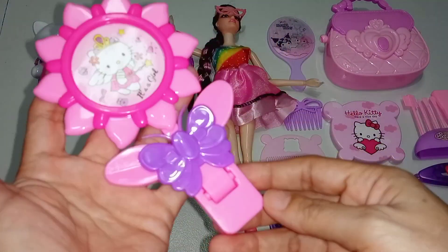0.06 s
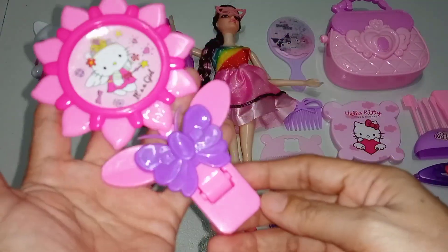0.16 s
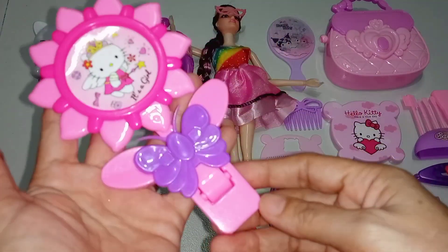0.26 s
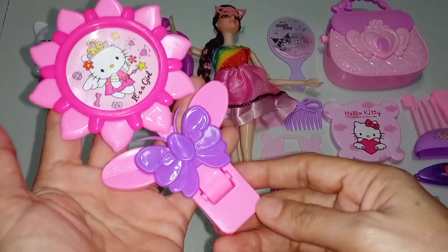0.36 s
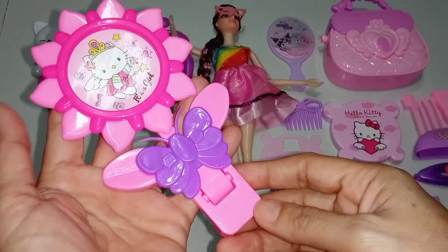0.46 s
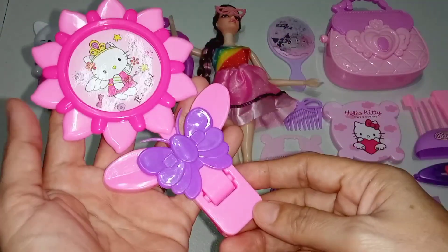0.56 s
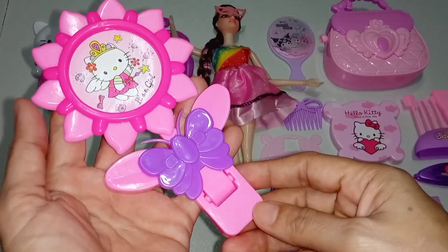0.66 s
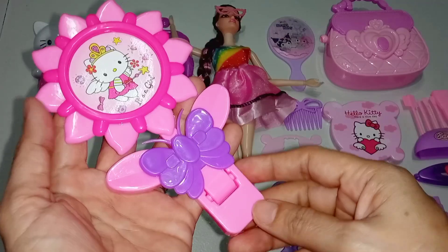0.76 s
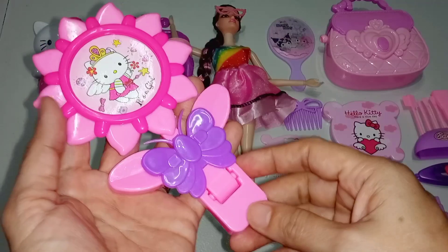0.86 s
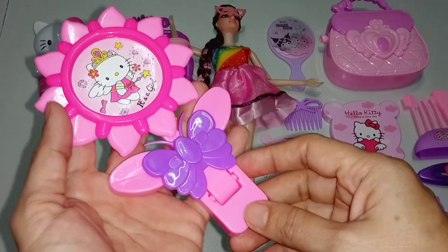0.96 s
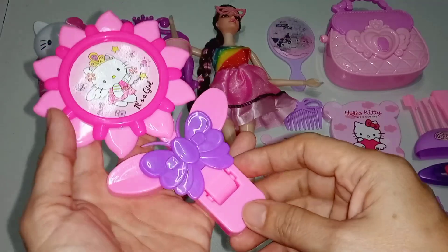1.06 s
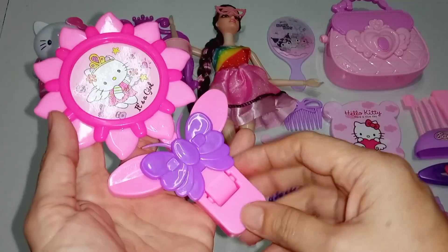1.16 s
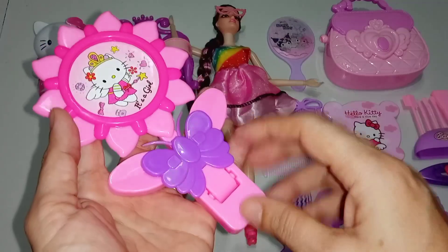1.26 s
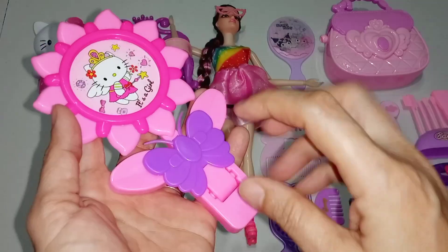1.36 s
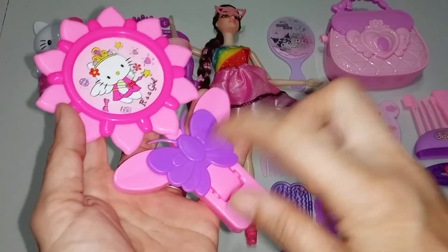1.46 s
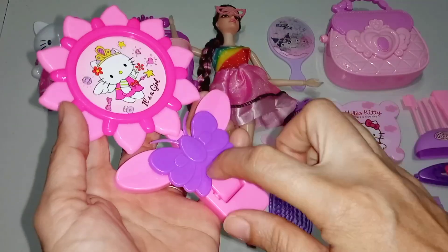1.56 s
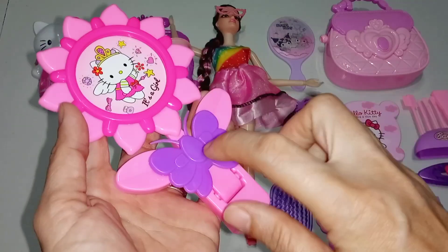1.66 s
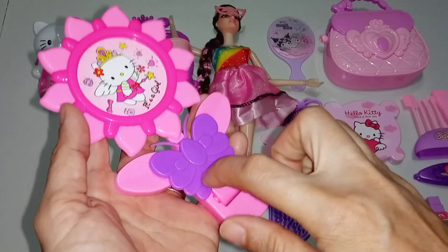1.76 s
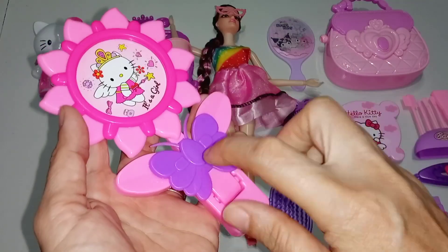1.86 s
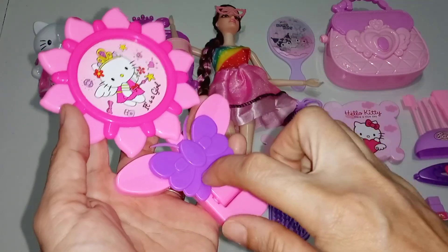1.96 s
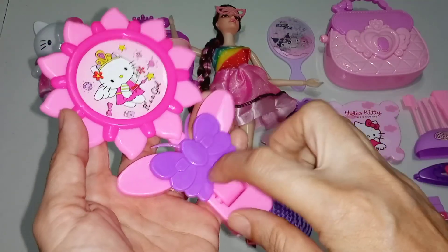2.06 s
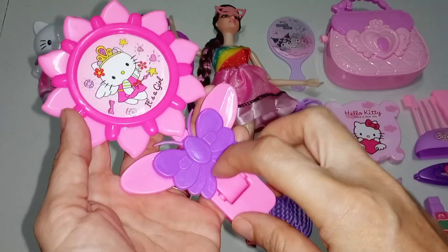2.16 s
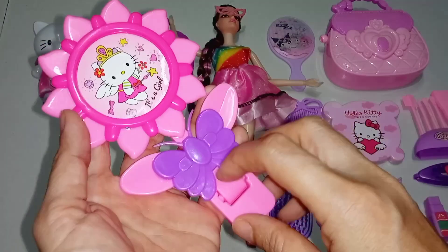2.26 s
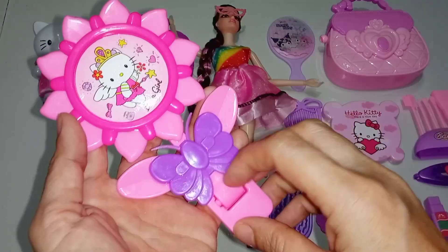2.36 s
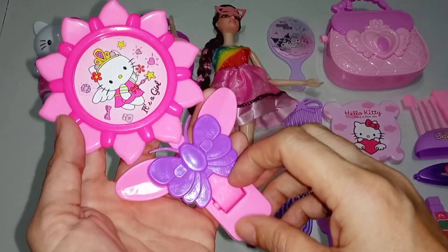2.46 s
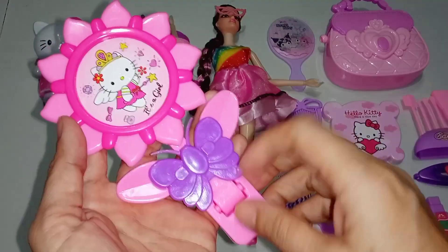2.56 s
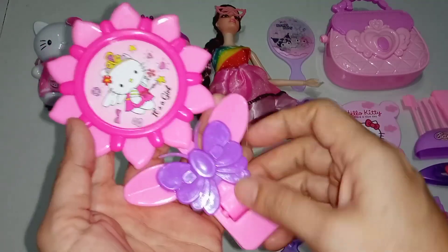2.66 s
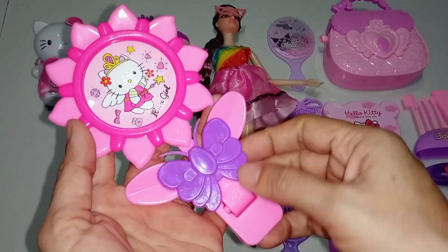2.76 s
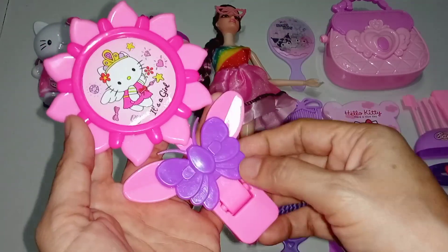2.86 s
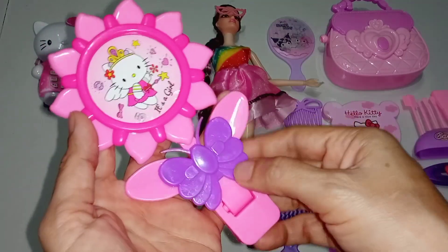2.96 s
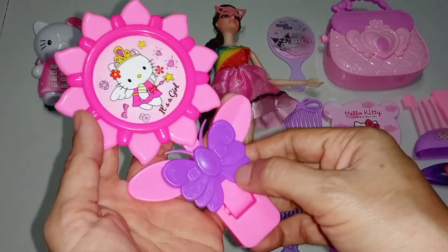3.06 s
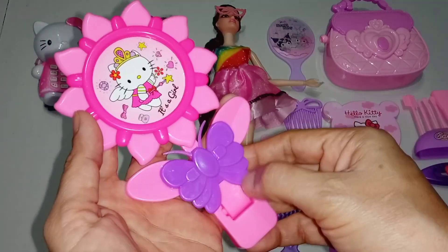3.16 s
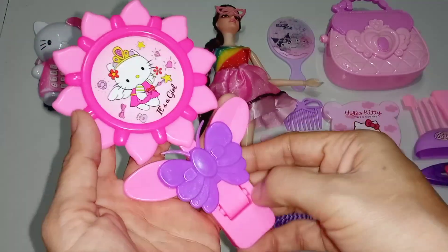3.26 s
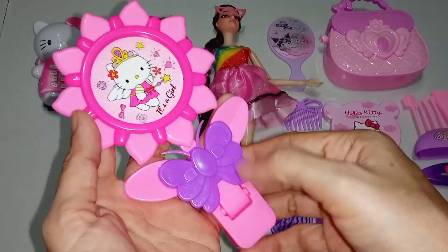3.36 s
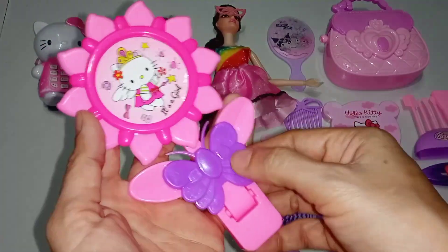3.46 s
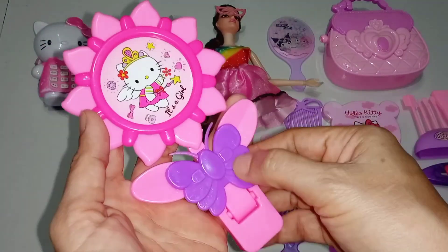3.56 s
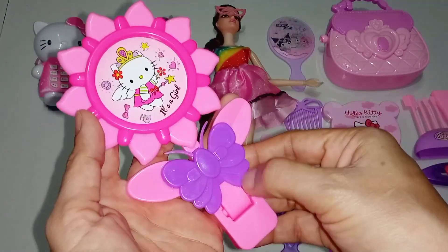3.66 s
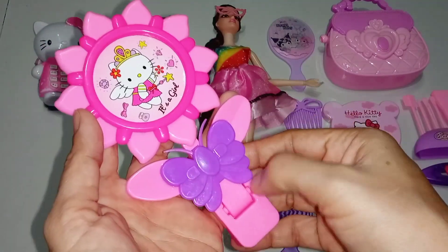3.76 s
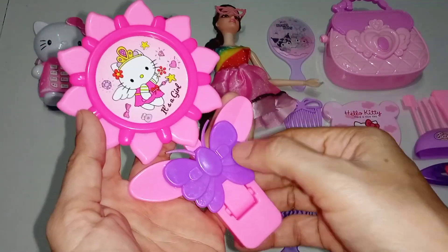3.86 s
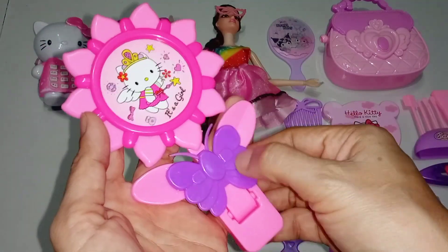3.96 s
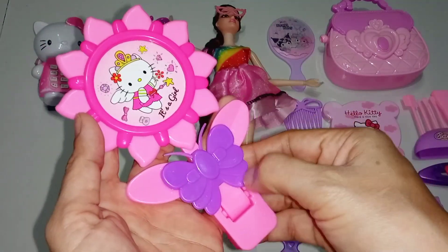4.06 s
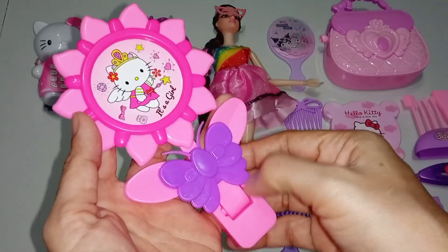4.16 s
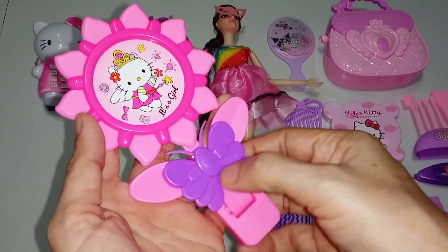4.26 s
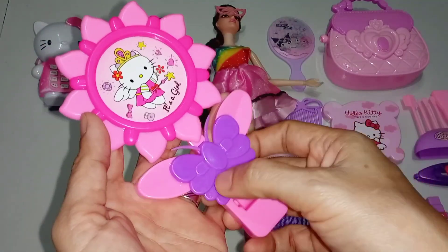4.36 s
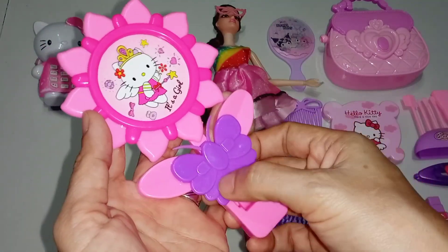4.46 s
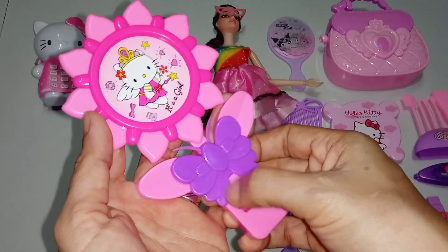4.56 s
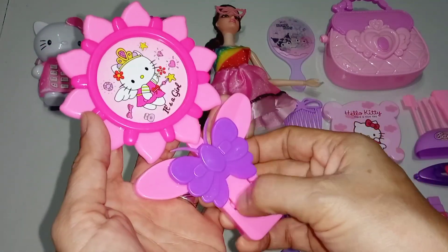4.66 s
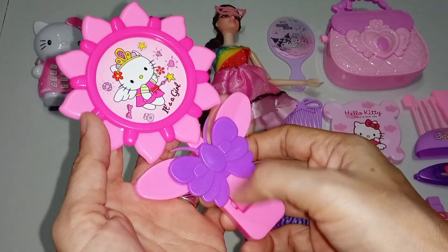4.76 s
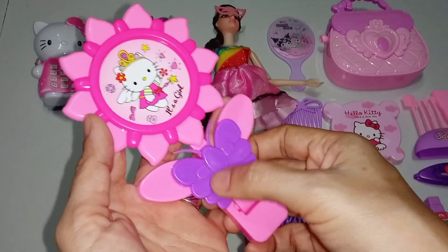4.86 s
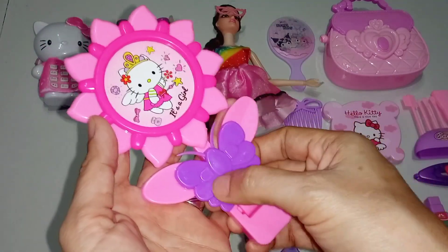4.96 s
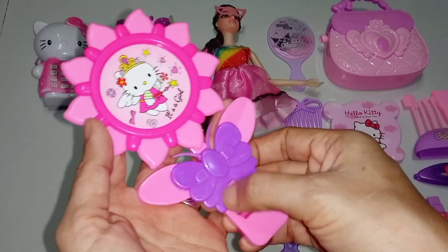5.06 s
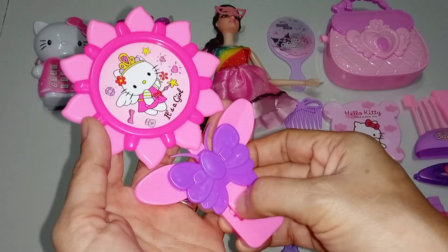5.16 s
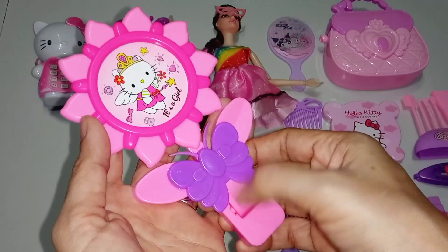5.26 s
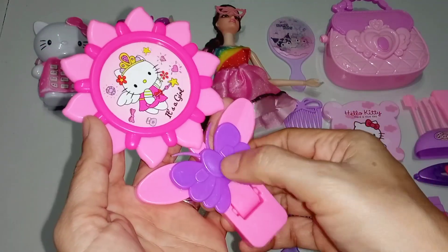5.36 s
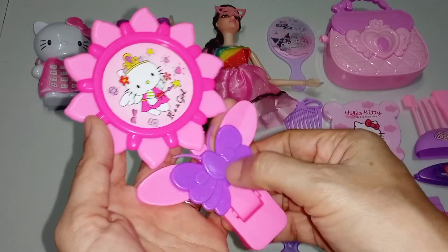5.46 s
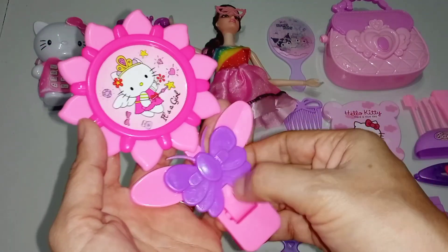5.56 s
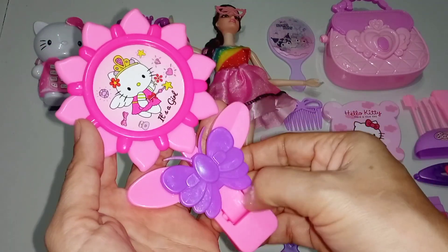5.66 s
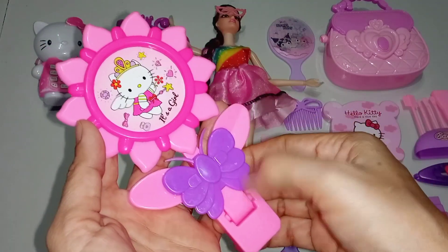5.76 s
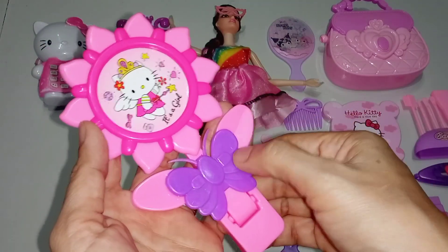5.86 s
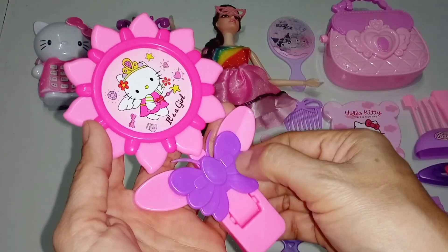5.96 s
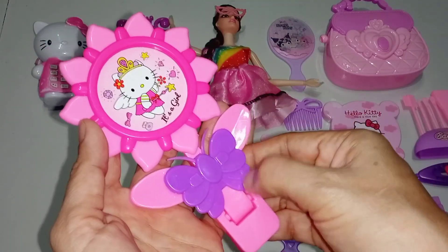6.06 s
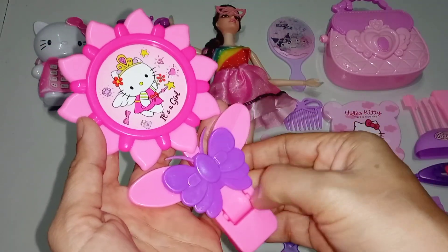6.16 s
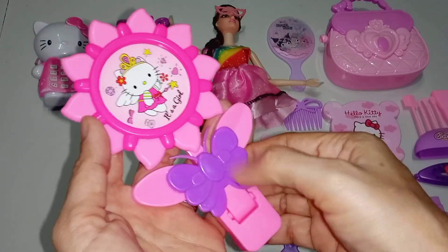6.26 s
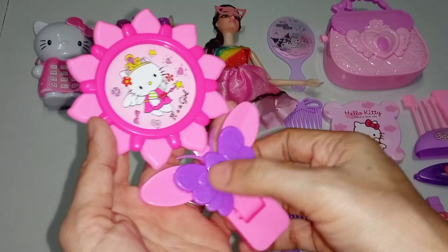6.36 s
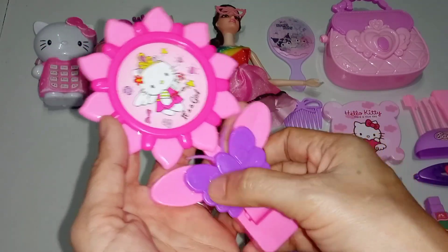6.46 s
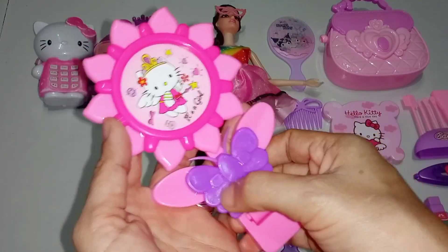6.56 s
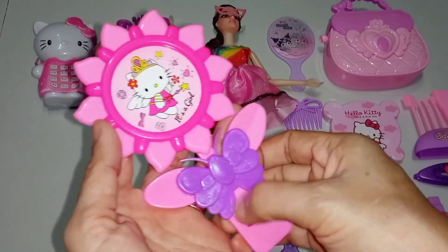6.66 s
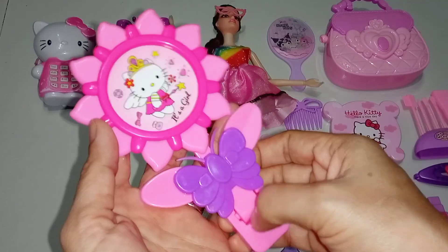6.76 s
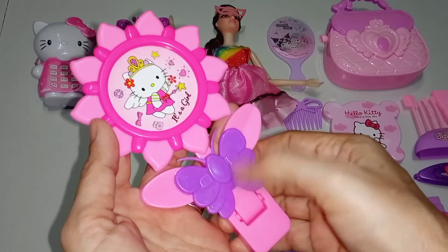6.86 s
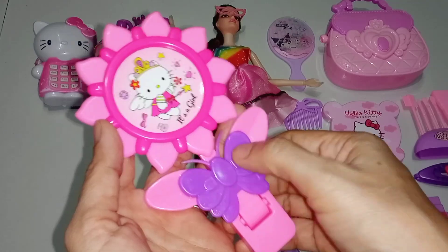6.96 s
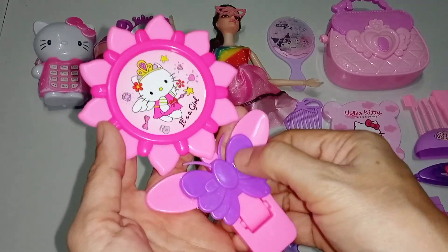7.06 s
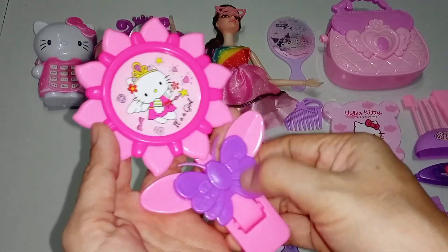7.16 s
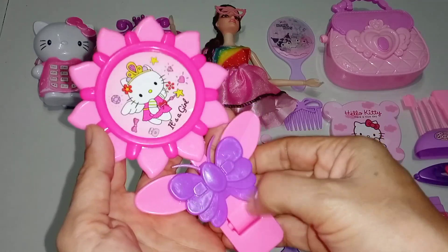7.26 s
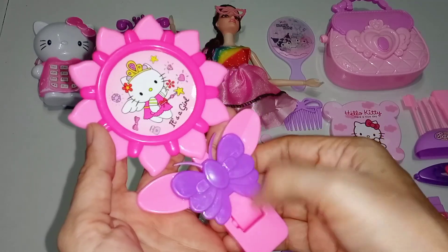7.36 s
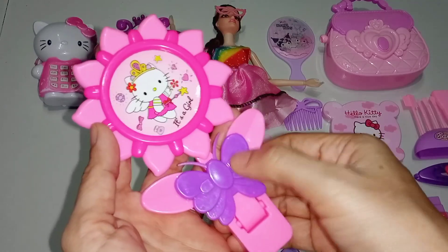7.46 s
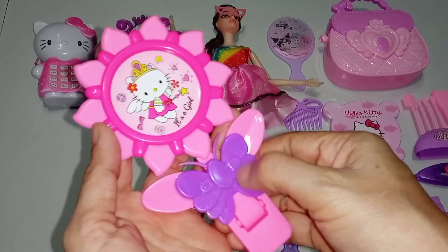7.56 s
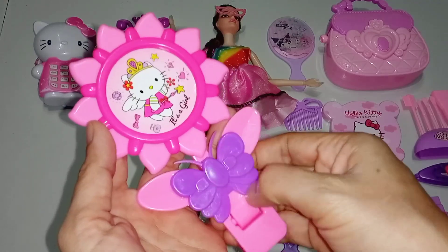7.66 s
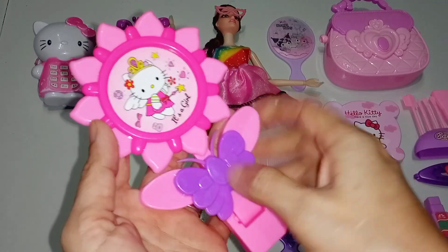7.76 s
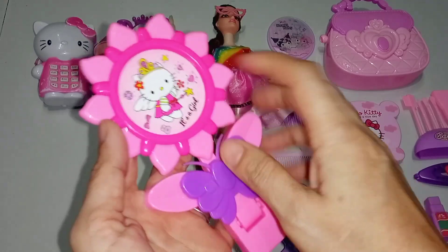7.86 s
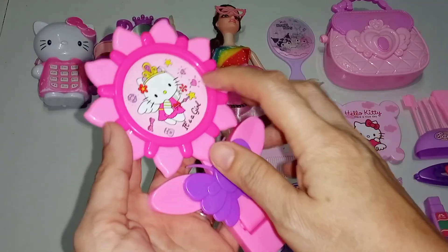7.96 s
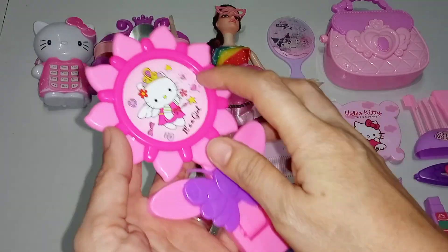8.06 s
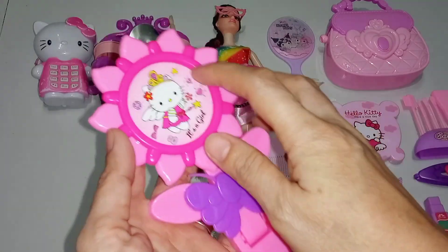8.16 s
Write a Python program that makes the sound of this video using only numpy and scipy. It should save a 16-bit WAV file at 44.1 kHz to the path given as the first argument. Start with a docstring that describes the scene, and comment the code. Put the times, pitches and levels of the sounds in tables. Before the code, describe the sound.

An appliance hums in a small room, with a low drone and the soft rush of its fan. Close to the microphone, a fingernail gives three light taps to the hollow plastic bow of a toy mirror. After a short pause, more taps and flicks follow in uneven clusters, a few of them much sharper. Each click is brief and hard, with only a slight room reflection.

```python
"""A small room opens on an appliance: a hum of mains harmonics, a low drone and the soft rush of its fan.
At 1.6 s a fingernail gives three light taps to the hollow plastic bow of a toy mirror, up close.
Each is a few hard micro-impacts that ring the thin shell for milliseconds; the walls answer briefly.
From 3.2 s to 8 s taps and flicks come in uneven clusters, sharpest near 5.2 s and 6.8 s, over the hum."""
import sys
import numpy as np
from scipy import signal
from scipy.fft import rfft, irfft, next_fast_len
from scipy.io import wavfile
from scipy.ndimage import map_coordinates

SR = 44100
rng = np.random.default_rng(int(sys.argv[2]) if len(sys.argv) > 2 else 0)


def dump_mix(stems):
    """Bounce the given channels to the path in sys.argv[1] as a 16-bit WAV at rate SR."""
    frames = np.atleast_2d(stems).T  # one column per channel
    limited = np.clip(frames, -1, 1)  # hard clip at full scale
    pcm = np.round(limited * 32767).astype(np.int16)
    wavfile.write(sys.argv[1], SR, pcm)


N = 362457


def amp(db):
    return 10 ** (np.asarray(db) / 20)


def unit_rms(x):
    return x / np.sqrt(np.mean(np.abs(x) ** 2) + 1e-20)


def curve_at(points, hz):
    """Read (f/Hz, value) breakpoints on a log frequency axis."""
    f, value = np.transpose(points)
    return np.interp(np.log(hz + 1), np.log(f + 1), value)


def eq(x, response):
    """Shape x with a gain given as a function of frequency."""
    size = next_fast_len(x.shape[-1] + 8192)
    return irfft(rfft(x, size) * response(np.fft.rfftfreq(size, 1 / SR)), size)[..., :x.shape[-1]]


def wobble(rate):
    """A smooth random modulator, rate knots a second."""
    return map_coordinates(rng.standard_normal(int(N * rate / SR) + 4), [np.arange(N) * rate / SR])


def noise_band(hz, width_hz, order=2):
    """Noise of rms 1 in one resonance; a higher order flattens its top."""
    return unit_rms(eq(rng.standard_normal(N), lambda f: 1 / (1 + (2 * (f - hz) / width_hz) ** order)))


# Tone of the fan and room air: f/Hz, relative level/dB
AIR_SPECTRUM = [(15, -65.5), (30, -32.5), (60, -18.5), (100, -13.5), (160, -19), (230, -19), (330, -24.5),
                (380, -18), (720, -24.5), (1170, -26), (4800, -35), (7000, -44.5), (7800, -50), (9000, -62)]
# Casing resonances in the fan noise: f/Hz, width/Hz, level/dB
CASING_BANDS = [(73, 6.1, -65), (200.6, 5.9, -67.5), (397, 57, -61.5), (1725, 290, -68), (2700, 330, -71.5),
                (4900, 160, -78.5), (6250, 340, -75.5)]
def fan(air_db=-51.5, treble_hz=6800):
    """A bed of rushing air, coloured by the casing; the level drifts a little, the treble flickers."""
    air = amp(air_db) * unit_rms(eq(rng.standard_normal(N), lambda f: amp(curve_at(AIR_SPECTRUM, f))))
    treble = eq(air, lambda f: 1 / (1 + (treble_hz / (f + 1)) ** 12))
    casing = sum(amp(db) * noise_band(hz, width_hz) for hz, width_hz, db in CASING_BANDS)
    drift_db = .4 * wobble(1.4) + .59 * wobble(12)
    flicker_db = 1.9 * wobble(1.3) + 2 * wobble(22)
    return (air - treble + casing) * amp(drift_db) + treble * amp(flicker_db)


# Partials of the hum: harmonic number, level/dB, width/Hz
HUM_PARTIALS = [(1, -70.5, 1.3), (2, -53.5, 5.2), (3, -61.5, 3), (4, -73.5, 0.93), (5, -62, 4.5),
                (6, -66.5, 8.4), (8, -65, 3), (9, -68, 5.8), (10, -79.5, 5.4), (11, -70.5, 9.8),
                (17, -66, 38)]
def mains_hum(mains_hz=59.9):
    """The appliance hums on mains harmonics, each a narrow, slightly unsteady band."""
    return sum(amp(db) * noise_band(k * mains_hz, width_hz) for k, db, width_hz in HUM_PARTIALS)


# Slow swells of the drone: t/s, level/dB
DRONE_ENVELOPE = [(0, -55), (.5, -51.5), (1, -47), (1.5, -47.5), (2, -50.5), (2.4, -51), (2.8, -45),
                  (3.3, -48.5), (3.7, -49), (4.1, -45), (4.6, -51.5), (4.9, -49.5), (5.3, -47),
                  (5.8, -44.5), (6.4, -45.5), (7.1, -57.5), (7.7, -46.5), (8.22, -52)]
def cabinet_drone():
    """The fan shakes the cabinet's low resonance."""
    times, level_db = np.transpose(DRONE_ENVELOPE)
    swell = amp(np.interp(np.arange(N) / SR, times, level_db))
    return swell * noise_band(hz=125.1, width_hz=21, order=4)


# Reverb time of the room: f/Hz, t60/s
ROOM_DECAY = [(500, 0.13), (2600, 0.22), (5000, 0.14), (8000, 0.14)]
# Tone of the reverb: f/Hz, relative level/dB
ROOM_COLOUR = [(500, -13.5), (1500, -10.5), (2600, -1), (4000, -4.5), (5500, 2.5), (7000, 2), (8500, -6)]
def room_tail(build_s=.0032):
    """A fresh reverb tail of energy 1; it builds up as the first walls answer."""
    hz, t, noise = signal.stft(rng.standard_normal(SR // 4), SR, nperseg=128)
    fade_db = curve_at(ROOM_COLOUR, hz)[:, None] - 60 * t / curve_at(ROOM_DECAY, hz)[:, None]
    build_up = 1 - np.exp(-(t / build_s) ** 2)
    tail = signal.istft(noise * amp(fade_db) * build_up, SR, nperseg=128)[1]
    return tail / np.linalg.norm(tail)


# Modes of the plastic shell: f/Hz, relative level/dB, t60/s
SHELL_MODES = [(293, -30, 0.023), (480, -29.5, 0.023), (982, 0, 0.0091), (1310, 0.5, 0.0042),
               (2050, -11, 0.0078), (2630, -15.5, 0.0052), (3100, -16, 0.0091), (3446, -14, 0.0058),
               (4340, -12.5, 0.0044), (5085, -21.5, 0.0096), (5830, -12, 0.0031), (6740, -17, 0.0063),
               (7390, -11, 0.0022)]
HANDLE_HZ, KNOCK_HZ = 700, 2124  # the knock lies between these; the handle's modes lie below
def shell_ring(t, knock_db, spot_hz, tilt_db, pivot_hz=4500, spot_db=5, spot_octaves=.12):
    """One impact cracks and rings the shell; modes near the struck spot's pitch ring more."""
    hz, level_db, t60 = (column[:, None] for column in np.transpose(SHELL_MODES))
    low = 1 / (1 + (hz / KNOCK_HZ) ** 6)
    tone_db = (hz > HANDLE_HZ) * low * knock_db + (1 - low) * tilt_db * np.log2(hz / pivot_hz)
    lift_db = spot_db * np.exp(-.5 * (np.log2(hz / spot_hz) / spot_octaves) ** 2)
    scatter_db, detune = rng.standard_normal((2, len(hz), 1))
    envelopes = amp(level_db + tone_db + lift_db + scatter_db - 60 * t / t60)
    modes = envelopes * np.sin(2 * np.pi * hz * (1 + .01 * detune) * t)
    polarity = (-1) ** np.arange(len(hz))[:, None]  # neighbouring modes push the air opposite ways
    attack = 1 - np.exp(-t / .0001)
    ring = (polarity * modes).sum(axis=0) * attack
    low_cut = signal.butter(2, 3000, "high", fs=SR, output="sos")  # a tiny contact radiates no bass
    crack = signal.sosfilt(low_cut, amp(-60 * t / .0021) * rng.standard_normal(len(t)))
    return ring + .25 * np.abs(ring).max() * crack


def nail_contact(gap_s, rebound_db, lead_s=.0008):
    """The nail touches lightly, lands its blow and rebounds twice."""
    impulses = np.zeros(SR // 100)
    impulses[0] = .032  # lead-in touch
    strikes_s = lead_s + np.cumsum([0, gap_s, rng.uniform(.0005, .00142)])
    impulses[np.round(strikes_s * SR).astype(int)] = amp([0, rebound_db, 1.4 * rebound_db + 3])
    return impulses


# Cue list of the nail: t/s, dry peak level/dB, knock gain/dB, spot f/Hz, treble tilt/(dB per octave),
# rebound gap/s, rebound gain/dB, reverb send/dB
TAP_CUES = [(1.6088,-26,-27.5,3400,4.5,.00088,-5,-3.5),(1.822,-39.5,-23,3810,9,.0008,-8,-15),(2.025,-32,-22,4900,9,.0006,-7,-10),(3.2178,-45,-15,3410,4,.0012,-6,-15),(3.2904,-21.5,-14.5,4940,4,0.0015,-5,-9),(3.7033,-24,-21,3910,4,.0008,-13,-9),(3.745,-35.5,-16,3480,1,.0006,-10,-8),(3.849,-37,-17,3810,0,0.0016,-10,-10),(4.113,-19.5,-18.5,7250,7,0.00065,-1,-7),(4.1602,-31.5,-19.5,4960,.1,.00064,-4,-9),(4.645,-36,-21,3420,1,.0009,-7,-12),(4.708,-14,-29,3620,-1,.0016,-8,-11),(5.145,-30,-27,6090,3,.0007,-3,-10),(5.1796,-28.5,-19,3500,5,.0006,-15,-9),(5.231,-11,-32.5,5900,-1.5,.00116,-16,-12),(5.596,-39,-22,5110,-5,0.00058,-8,-8),(5.6158,-36,-20,3800,5,0.00055,-5,-6),(5.7383,-15.5,-32,4320,-4.5,.00116,-7,-11.5),(6.125,-20,-12,5060,4.5,.0006,-8.5,-8),(6.1663,-29.5,-13,3410,1,.0006,-3,-13),(6.2278,-20.5,-19.5,5070,-5,.00078,-6.5,-8),(6.558,-40,-15,4930,2,.0018,-5,-9),(6.701,-23.5,-22.5,5880,-1.5,.00084,-6.5,-12.5),(6.734,-22,-20,5000,.5,.0006,-14,-13),(6.7813,-12.5,-33,5200,-8,.00118,-7,-10),(7.2373,-23.5,-16.5,4600,.1,.00096,-12.5,-11),(7.3085,-21,-18.5,3470,2,.00116,-15,-10.5),(7.3448,-30,-26,3280,-1,.0014,-8,-15),(7.3962,-18,-23.5,5000,1,.0006,3,-9.5),(7.676,-21.5,-28,5100,-5,.00096,-9.5,-12.5),(7.7154,-21.5,-25,3100,-2.5,0.00093,-8,-9),(7.7523,-31,-24,3380,-1,0.0021,-8,-7),(8.0174,-43,-21,4860,0,.0008,-8,-14)]
def nail_taps():
    """Each tap strikes the shell at a new spot: a dry click, then the room's short answer."""
    track, t = np.zeros(N + SR), np.arange(SR // 25) / SR
    for start_s, peak_db, knock_db, spot_hz, tilt_db, gap_s, rebound_db, send_db in TAP_CUES:
        ring = shell_ring(t, knock_db, spot_hz, tilt_db)
        click = np.convolve(nail_contact(gap_s, rebound_db), ring)
        click *= amp(peak_db) / np.abs(click).max()
        # the walls hear the shell from all sides, so its modes blur into one broad colour
        blur = ring * amp(-60 * t / .0014)
        send = amp(send_db) * np.linalg.norm(click) / np.linalg.norm(blur)
        tap = send * signal.fftconvolve(blur, room_tail())
        tap[:len(click)] += click
        track[round(start_s * SR):][:len(tap)] += tap
    return track[:N]


def scene():
    """Mono mix: the taps up front, the appliance behind."""
    return (nail_taps() + mains_hum() + cabinet_drone() + fan())[None]


# Microphone EQ, falling steeply above the speech band: f/Hz, level/dB
MIC_EQ = [(20, -0.5), (7000, 0.5), (7600, -3), (8000, -10.5), (8400, -21.5), (8700, -35), (9200, -46.5),
          (11000, -55), (14000, -63.5)]
def record(dry, port_hz=5080, width_hz=300, port_db=2.5, hiss_db=-97.5, top_hz=15700):
    """The microphone rings at its port, dulls the top, gently saturates peaks and adds faint hiss."""
    def port(f):
        resonance = 1j * f * width_hz / (port_hz ** 2 - f ** 2 + 1j * f * width_hz)
        return 1 + (amp(port_db) - 1) * resonance

    heard = eq(dry, lambda f: amp(curve_at(MIC_EQ, f)) * port(f))
    saturated = heard + .03 * heard ** 2 - .05 * heard ** 3
    hiss = amp(hiss_db) * rng.standard_normal(dry.shape)
    return eq(saturated + hiss, lambda f: f < top_hz)


dry = scene()
out = record(dry)
dump_mix(out)
```